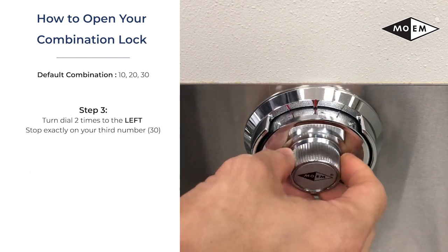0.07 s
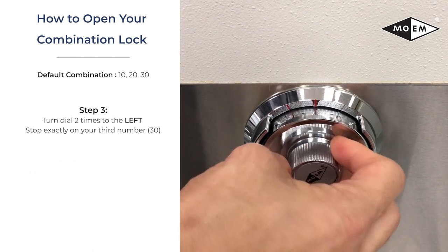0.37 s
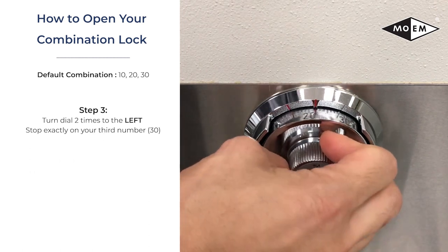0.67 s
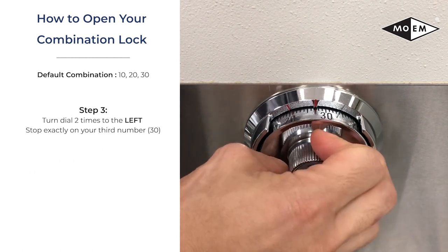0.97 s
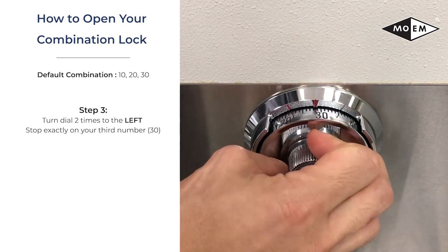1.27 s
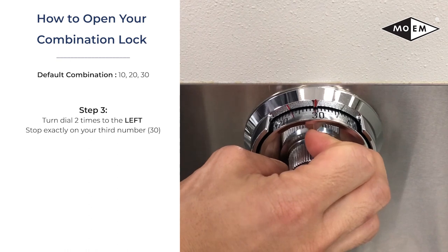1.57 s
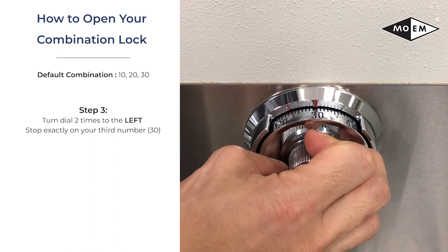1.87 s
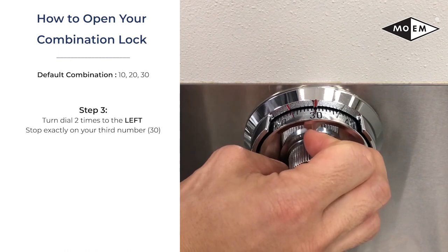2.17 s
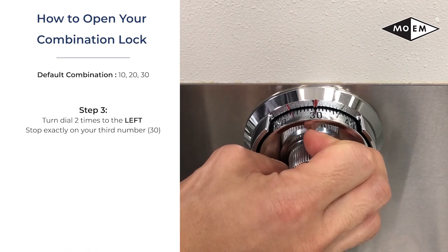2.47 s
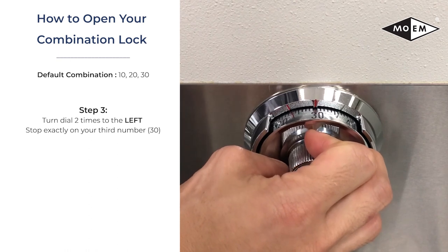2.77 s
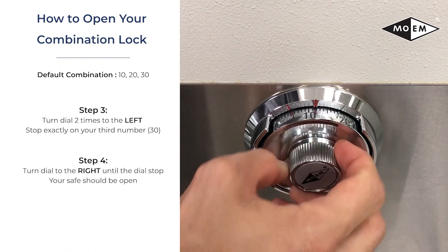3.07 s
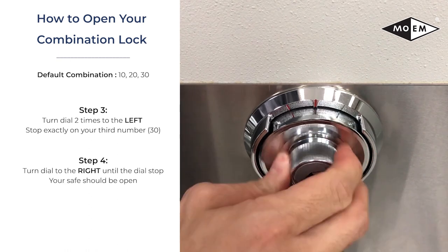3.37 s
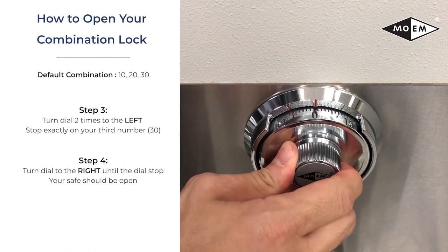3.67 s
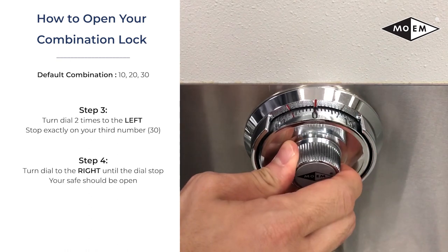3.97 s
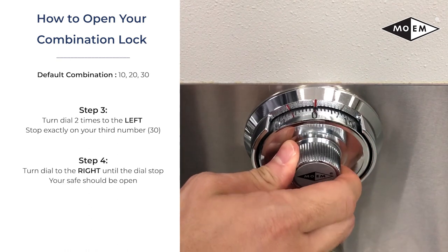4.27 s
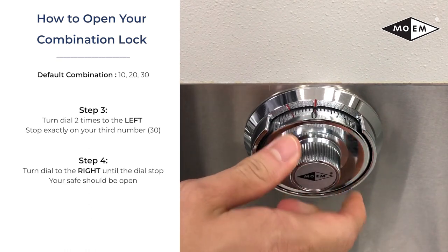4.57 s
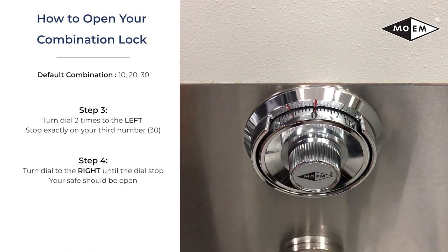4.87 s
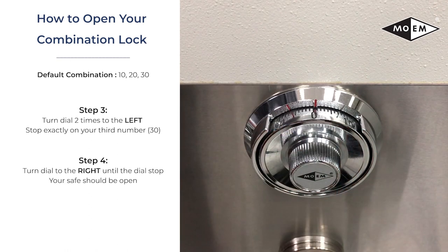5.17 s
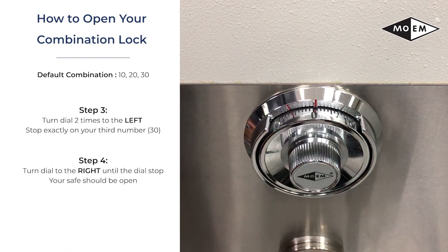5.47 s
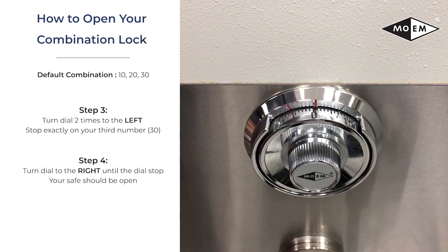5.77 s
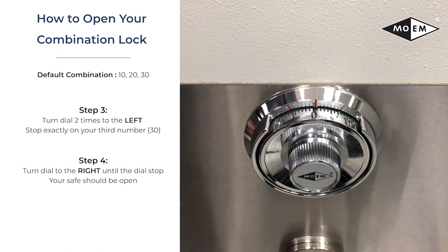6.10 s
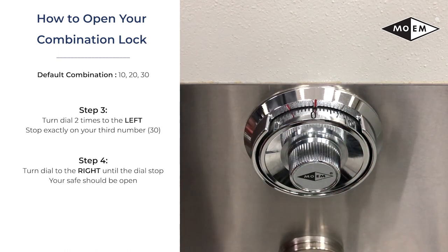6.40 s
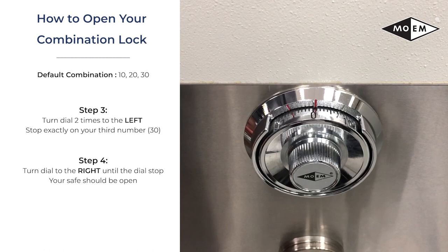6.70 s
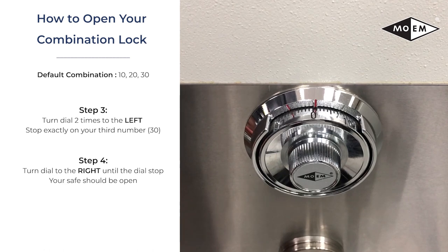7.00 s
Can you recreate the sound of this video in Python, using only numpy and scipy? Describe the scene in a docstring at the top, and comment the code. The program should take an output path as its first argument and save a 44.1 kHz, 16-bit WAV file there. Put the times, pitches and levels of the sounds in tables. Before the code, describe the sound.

Faint ticks and a sharp click from a safe's combination dial, followed by a heavy, rattling clunk of bolts over low ventilation hum.

```python
"""In a small quiet room with humming ventilation, a hand turns the dial of a steel safe near the microphone.
The wheels tick faintly, the spindle drags and the lock snaps against its stop; a sleeve rustles as the
arm moves to the handle. The handle takes up its play, and the bolts slide and slam home with a rattle
that booms in the door and overloads the microphone. Lock, handle and bolts rebound after each impact;
harder impacts are brighter, and the hardest excites the part's distinct normal modes."""
import sys
import numpy as np
from scipy import signal
from scipy.fft import rfft, irfft
from scipy.io import wavfile
from scipy.ndimage import uniform_filter1d

SR = 44100
rng = np.random.default_rng(int(sys.argv[2]) if len(sys.argv) > 2 else 0)


def transcribe(u):
    """Save the signal u as a 16-bit wav file named by the first command-line argument.

    u: samples, shape (n,) or (channels, n), limited to [-1, 1]; the rate is SR.
    q: integer samples, one column per channel.
    """
    v = np.clip(np.atleast_2d(u).T, -1, 1)
    q = np.round(v * 32767).astype(np.int16)
    wavfile.write(sys.argv[1], SR, q)


N = 314874
TIME = np.arange(N) / SR
AFTER = TIME[:SR]  # the second that follows an impact


def undb(db):
    """Amplitude ratio of a level in decibels."""
    return 10 ** (np.asarray(db) / 20)

def unit(x):
    """Normalisation to rms 1."""
    return x / np.sqrt(np.mean(x ** 2))

def at_hz(points, hz):
    """Interpolation of (frequency, value) points on a log-frequency axis."""
    f, value = np.transpose(points)
    return np.interp(np.log(np.maximum(hz, 1)), np.log(f), value)

def colour(x, spectrum, tilt_db=0):
    """Spectral shaping to rms 1; above 1 kHz a slope of tilt_db per octave pivots about 2 kHz."""
    hz = np.fft.rfftfreq(len(x), 1 / SR)
    octaves = np.log2(np.maximum(hz / 2000, 1 / 2))
    return unit(irfft(rfft(x) * undb(at_hz(spectrum, hz) + tilt_db * octaves), len(x)))

def walk(rate):
    """Smooth random fluctuation of rms 1, with `rate` new values a second."""
    hold = int(SR / rate)
    steps = np.repeat(rng.standard_normal(N // hold + 1), hold)
    return unit(uniform_filter1d(steps, hold)[:N])

def wavering_tone(hz, drift_hz, rate):
    """Random frequency modulation of a sinusoid of rms 1."""
    frequency = hz + drift_hz * walk(rate)
    return unit(np.sin(2 * np.pi * np.cumsum(frequency) / SR))

def swell(start, attack, release):
    """Amplitude envelope with a quarter-sine rise and fall."""
    return np.sin(np.pi / 2 * np.interp(TIME - start, [0, attack, attack + release], [0, 1, 0]))

def strokes(rows):
    """Summed envelopes of several strokes, each at its own level."""
    return sum(undb(db) * swell(start, attack, release) for start, attack, release, db in rows)

def fade(t60):
    """Exponential damping: 60 dB in t60 seconds."""
    return np.exp(-np.log(1000) * AFTER / max(t60, 1e-3))

def add(out, time, sound):
    """Superposition of a sound that starts at `time` seconds."""
    i = int(time * SR)
    out[i:i + len(sound)] += sound[:N - i]

def dense_ring(spectrum, decays, tilt_db=0):
    """High modal overlap: countless modes merge into noise whose octaves decay at their own rates."""
    noise = rfft(colour(rng.standard_normal(SR), spectrum, tilt_db))
    octave = np.log2(np.clip(np.arange(len(noise)), 32, 16384))  # bins are 1 Hz apart
    return sum(irfft(noise * np.maximum(1 - abs(octave - k), 0), SR) * fade(at_hz(decays, 2 ** k))
               for k in range(5, 15))

def modal_ring(modes):
    """Normal modes: damped sinusoids of alternating sign, each building up over about one cycle."""
    out = np.zeros(SR)
    for k, (hz, db, t60) in enumerate(modes):
        build_up = 1 - np.exp(-hz * AFTER)
        out += (-1) ** k * undb(db) * np.sin(2 * np.pi * hz * AFTER) * fade(t60) * build_up
    return out

def friction(spectrum, grain_db, catch_db, catch_rate):
    """Sliding friction: dense tiny slips of uneven size, bunched where the surfaces catch."""
    slips = rng.standard_normal(N)
    size_db = grain_db * rng.standard_normal(N) + catch_db * walk(catch_rate)
    return colour(slips * undb(size_db), spectrum)

SOFT_DULLING = 0.15  # treble lost [dB per octave] for each dB below the hardest impact
def impacts(blows, spectrum, decays, tilt_db, bounce_s, bounce_db):
    """Impact excitation: each blow strikes another spot and rebounds once; softer blows are duller."""
    out = np.zeros(N)
    hardest_db = max(db for _, db in blows)
    for time, db in blows:
        tilt = tilt_db - SOFT_DULLING * (hardest_db - db)
        add(out, time, undb(db) * dense_ring(spectrum, decays, tilt))
        add(out, time + bounce_s, undb(db + bounce_db) * dense_ring(spectrum, decays, tilt))
    return out

def ringing(blows, modes, ring_db):
    """Free vibration of a part's distinct modes after its hardest blow."""
    out = np.zeros(N)
    time, db = max(blows, key=lambda blow: blow[1])
    add(out, time, undb(db + ring_db) * modal_ring(modes))
    return out


# spectrum of the airflow (frequency [Hz], relative level [dB])
AIR_SPECTRUM = [(15, -55.5), (25, -22.5), (64, -13.5), (82, -8), (102, 0), (127, -9), (170, -4), (270, -10),
                (301, -9), (373, -14), (463, -14.5), (775, -20), (1740, -24.5), (2050, -26), (16000, -53)]
# fan tones (frequency [Hz], level [dB])
FAN_TONES = [(102.3, -60.5), (166.9, -63.5), (298, -65.5)]
def ventilation():
    """Broadband flow noise with fan tones that fluctuate in level and frequency."""
    rush = undb(-47) * colour(rng.standard_normal(N), AIR_SPECTRUM)
    hum = sum(undb(db + 4.5 * walk(5.3)) * wavering_tone(hz, drift_hz=1.475, rate=10)
              for hz, db in FAN_TONES)
    return rush + hum

# pin contacts (time [s], level [dB], treble slope [dB/octave], ring level [dB])
PIN_TICKS = [(.3585, -57, 6, -72), (.3892, -41.5, 7, -63), (.3925, -41, 0, -65), (.6205, -60, 2, -53),
             (3.1105, -47, 3, -62), (3.1447, -39.5, 0, -51), (3.1701, -33.5, -1, -62),
             (3.1928, -34, 1, -46), (3.2373, -41.5, -3, -74)]
# spectrum of a tick (frequency [Hz], relative level [dB])
TICK_SPECTRUM = [(300, -17), (1000, 5.5), (2800, -12.5), (4200, 3.5), (6500, 0), (9000, -10), (12000, -12),
                 (15000, -14)]
# damping of a tick (frequency [Hz], T60 [s])
TICK_T60 = [(1000, 0.012), (6000, 0.011)]
# modes of the wheels (frequency [Hz], relative level [dB], T60 [s])
WHEEL_MODES = [(8060, -19, 0.28), (12080, -8, .11), (13290, -17, .08)]
def wheels():
    """Impulse response of the thinly ringing wheels to drive pins; glancing contacts are brighter."""
    out, ring = np.zeros(N), modal_ring(WHEEL_MODES)
    for time, db, tilt_db, ring_db in PIN_TICKS:
        tick = undb(db) * dense_ring(TICK_SPECTRUM, TICK_T60, tilt_db)
        add(out, time, tick + undb(ring_db) * ring)
    return out

# turns that drag (time [s], attack [s], release [s], level [dB])
DRAG_STROKES = [(3.06, .03, .15, -57), (3.104, .011, 0.014, -46), (3.44, .01, .03, -49)]
# spectrum of the drag (frequency [Hz], relative level [dB])
DRAG_SPECTRUM = [(300, -13), (700, 3), (1000, 7.5), (1500, -7), (3500, -3), (6000, -18), (11500, -25),
                 (13700, -9), (16000, -20)]
def spindle():
    """Sliding friction of the dial on its spindle as it turns back and nears the stop."""
    return strokes(DRAG_STROKES) * friction(DRAG_SPECTRUM, grain_db=3.5, catch_db=4, catch_rate=400)

# impacts on the stop (time [s], level [dB])
LOCK_BLOWS = [(3.4702, -7), (3.4872, -18), (3.4945, -21.5)]
# spectrum of the lock (frequency [Hz], relative level [dB])
LOCK_SPECTRUM = [(100, -17), (400, -7), (800, -7), (1500, 1.5), (3000, -1), (4500, -8), (8000, -12),
                 (10500, -15.5), (12000, -18.5), (14000, -9.5), (16000, -7)]
# damping of the lock (frequency [Hz], T60 [s])
LOCK_T60 = [(300, 0.13), (1500, 0.038), (5000, 0.037), (15000, 0.045)]
# modes of the lock (frequency [Hz], relative level [dB], T60 [s])
LOCK_MODES = [(362, 0, 0.3), (1010, 3, 0.18), (1145, -1.5, 0.17), (1605, 4, .12), (1780, 3, 0.14),
              (2180, -10, 0.17), (2740, 6, 0.087), (3234, -7.5, 0.34), (3260, -5, 0.43), (3380, -14, .36),
              (3600, -8, 0.14), (8080, -19, .34), (13400, 2.5, .12), (15300, 0, .07)]
def lock_stop():
    """Impact and rebound: the lock runs into its stop, chatters and rings."""
    snap = impacts(LOCK_BLOWS, LOCK_SPECTRUM, LOCK_T60, tilt_db=1.8, bounce_s=0.002, bounce_db=-6)
    return snap + ringing(LOCK_BLOWS, LOCK_MODES, ring_db=-22.5)

# slips (time [s], duration [s], start frequency [Hz], end frequency [Hz], level [dB])
SLIP_CHIRPS = [(3.4737, 0.0078, 1075, 983, -3), (3.4745, 0.0032, 14900, 15200, -14),
               (3.486, 0.0045, 15250, 15150, -11.5), (4.376, .014, 15500, 11000, -50)]
def chirps():
    """Stick-slip oscillation: metal slipping on metal sings for a few milliseconds."""
    out = np.zeros(N)
    for time, duration, start_hz, end_hz, db in SLIP_CHIRPS:
        hz = np.linspace(start_hz, end_hz, int(duration * SR))
        glide = np.sin(2 * np.pi * np.cumsum(hz) / SR)
        add(out, time, undb(db) * np.hanning(len(hz)) * glide)
    return out

# arm movements (time [s], attack [s], release [s], level [dB])
SLEEVE_STROKES = [(4.65, 0.071, 0.42, -57.5), (5.07, 0.15, 0.25, -52.5)]
# spectrum of the cloth (frequency [Hz], relative level [dB])
SLEEVE_SPECTRUM = [(150, -7), (500, 6), (2200, -1.5), (5000, -7.5), (9000, -15.5), (15500, -14)]
def sleeve():
    """Friction noise of cloth as the arm leaves the dial, then reaches for the handle."""
    return strokes(SLEEVE_STROKES) * friction(SLEEVE_SPECTRUM, grain_db=5, catch_db=1, catch_rate=140)

# two finger touches, then the clack of engagement (time [s], level [dB])
HANDLE_BLOWS = [(5.2530, -42), (5.3315, -46.5), (6.0803, -26)]
# spectrum of the handle (frequency [Hz], relative level [dB])
HANDLE_SPECTRUM = [(100, -12), (550, 1.5), (1200, -11), (2500, -6.5), (4000, -7.5), (8000, -22),
                   (15000, -24.5)]
# damping of the handle (frequency [Hz], T60 [s])
HANDLE_T60 = [(500, 0.08), (3000, 0.043), (12000, .025)]
# modes of the handle (frequency [Hz], relative level [dB], T60 [s])
HANDLE_MODES = [(160.3, 1, 0.37), (356.5, 6.5, 0.15), (488, -3, 0.041), (553, -2.5, .11), (645, -4, .08),
                (710, -8, .1), (2680, -19.5, .12)]
def handle():
    """Backlash impact: the handle is touched, then clacks and rings as it takes up its play."""
    clack = impacts(HANDLE_BLOWS, HANDLE_SPECTRUM, HANDLE_T60,
                    tilt_db=-0.6, bounce_s=0.014, bounce_db=-8.5)
    return clack + ringing(HANDLE_BLOWS, HANDLE_MODES, ring_db=-6)

STRAIN_S, FREE_S, LAND_S = 6.12, 6.24, 6.342  # the bolts start to creep, break free and land
CREEP_DB, SCRAPE_DB, GROAN_DB = -54.5, -23.5, -39.5
# spectrum of the sliding bolts (frequency [Hz], relative level [dB])
SLIDE_SPECTRUM = [(50, -5.5), (110, 4), (280, 3.5), (450, 4.5), (1000, 3.5), (2400, -6), (3100, -20.5),
                  (6000, -27.5), (15000, -32.5)]
def bolt_slide():
    """Friction grows as a power of speed as the bolts accelerate; the strained door groans first."""
    speed = np.clip((TIME - FREE_S) / (LAND_S - FREE_S), 0, 1)
    moving = (TIME > STRAIN_S) & (TIME < LAND_S)
    rubbing = moving * (undb(CREEP_DB) + undb(SCRAPE_DB) * speed ** 1.9)
    scrape = rubbing * friction(SLIDE_SPECTRUM, grain_db=5, catch_db=1.9, catch_rate=200)
    strain = undb(GROAN_DB) * swell(STRAIN_S, attack=0.07, release=0.1)
    return scrape + strain * wavering_tone(hz=215, drift_hz=8, rate=31)

# the bolts knock, slam home and rattle (time [s], level [dB])
BOLT_BLOWS = [(6.3218, -20), (6.3411, -1.5), (6.3590, -6), (6.3675, -3.5), (6.3850, -8), (6.3903, -4),
              (6.4200, -16.5)]
# spectrum of the door (frequency [Hz], relative level [dB])
DOOR_SPECTRUM = [(30, -22), (70, -5), (300, -0.5), (420, -11), (650, 0), (1400, -1.5), (1800, 2.5),
                 (2560, -3), (2720, -8), (4000, -15.5), (6000, -21.5), (11000, -24), (15500, -18.5)]
# damping of the door (frequency [Hz], T60 [s])
DOOR_T60 = [(80, 0.25), (400, 0.083), (2000, 0.062), (6000, 0.075), (15000, 0.041)]
# modes of the door (frequency [Hz], relative level [dB], T60 [s])
DOOR_MODES = [(51.6, -14, .35), (80, -10.5, .65), (125.7, -7, 0.4), (210.6, -1, 0.37), (295, 4.5, 0.12),
              (340, 6, .14), (462, -10, 0.28), (625.5, -8, 0.44), (690, 2, 0.1), (823, -21.5, 0.35),
              (918, -20, 0.94), (1074, -9, 0.15), (1219, -4.5, 0.13), (1476, -7, 0.25), (1613, -10.5, 0.3),
              (1760, -2.5, 0.15), (1780, -1, 0.092), (1952, -1, 0.15), (2110, -16.5, 0.4),
              (2290, -2.5, 0.1), (2400, -2, .12), (2450, -8, 0.1), (3120, -15, 0.17), (3210, -11.5, 0.12),
              (3620, -10.5, .16)]
def bolt_slam():
    """Structural resonance: the bolts hit their stops and the steel door booms."""
    slam = impacts(BOLT_BLOWS, DOOR_SPECTRUM, DOOR_T60, tilt_db=1, bounce_s=0.0047, bounce_db=-10.5)
    return slam + ringing(BOLT_BLOWS, DOOR_MODES, ring_db=-9.5)

# spectrum of the reflections (frequency [Hz], relative level [dB])
ROOM_SPECTRUM = [(60, 1), (300, -2), (1000, 1), (2200, -5), (4500, -5), (7000, -2.5), (10000, -5),
                 (13500, -5), (15200, -8)]
# reverberation time (frequency [Hz], T60 [s])
ROOM_T60 = [(80, 0.93), (300, 0.56), (1500, 0.46), (4500, 0.6), (7500, 0.5), (10000, 0.33), (15000, 0.2)]
def room(direct, wet_db, build_s=0.006):
    """Reverberation: reflections off near walls thicken into a short tail behind the direct sound."""
    tail = dense_ring(ROOM_SPECTRUM, ROOM_T60) * (1 - np.exp(-AFTER / build_s))
    return direct + undb(wet_db) * signal.fftconvolve(direct, tail / np.linalg.norm(tail))[:N]

def scene():
    """Superposition of ventilation, lock, sleeve and boltwork; only the metal parts reverberate."""
    air = ventilation()
    dial = room(wheels() + spindle() + lock_stop(), wet_db=-16.5, build_s=0.005)
    slips = room(chirps(), wet_db=-24)
    rustle = sleeve()
    boltwork = room(handle() + bolt_slide() + bolt_slam(), wet_db=-14)
    return (air + dial + slips + rustle + boltwork)[None]

LOW_CUT_HZ, TOP_HZ = 37, 15900
def record(dry):
    """Band limiting and overload: the microphone sheds deep bass, the slam clips, and the top is cut."""
    high_pass = signal.butter(4, LOW_CUT_HZ, "high", fs=SR, output="sos")
    low_pass = signal.ellip(8, 0.1, 50, TOP_HZ, fs=SR, output="sos")
    clipped = np.clip(signal.sosfilt(high_pass, dry), -1, 1)
    return signal.sosfiltfilt(low_pass, clipped)


dry = scene()
out = record(dry)
transcribe(out)
```